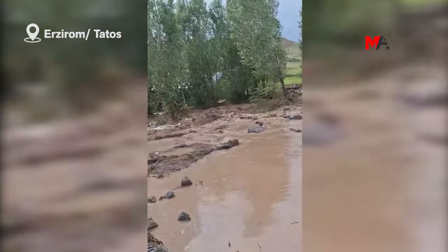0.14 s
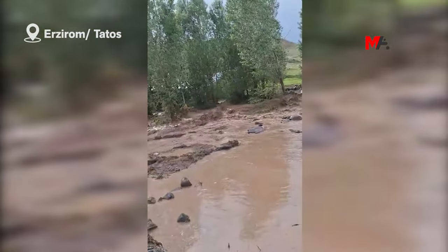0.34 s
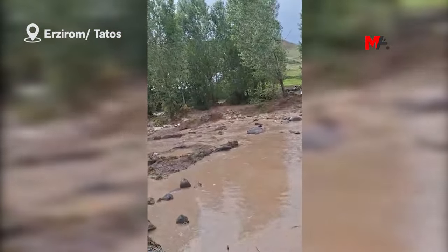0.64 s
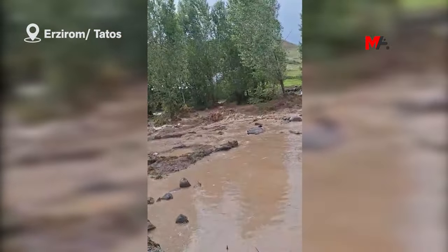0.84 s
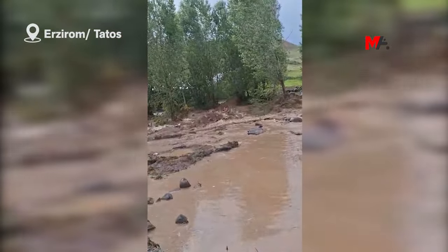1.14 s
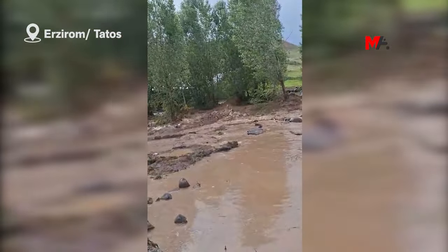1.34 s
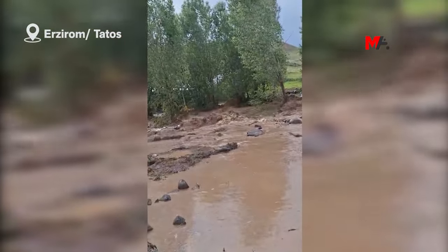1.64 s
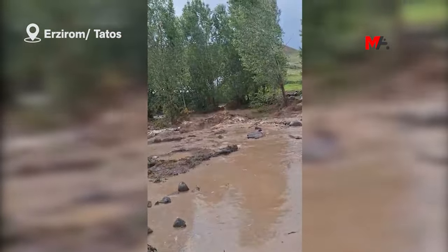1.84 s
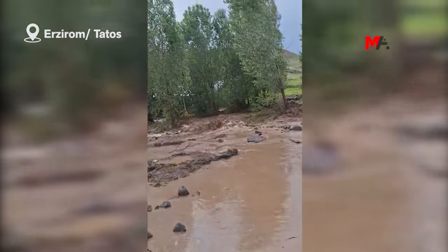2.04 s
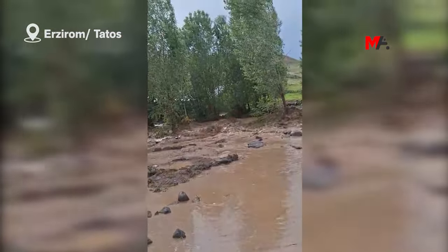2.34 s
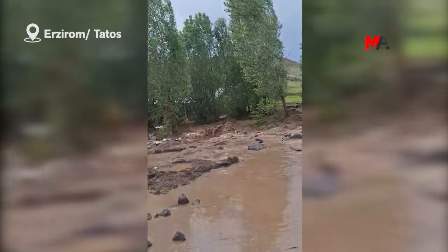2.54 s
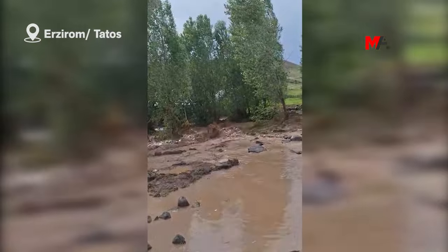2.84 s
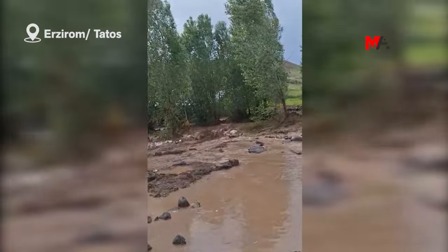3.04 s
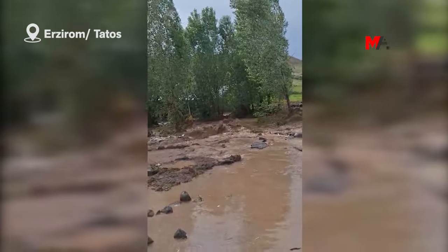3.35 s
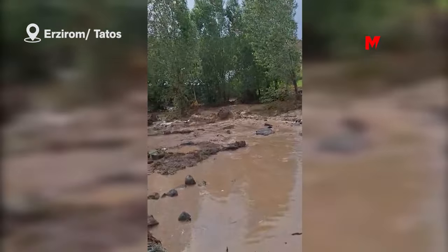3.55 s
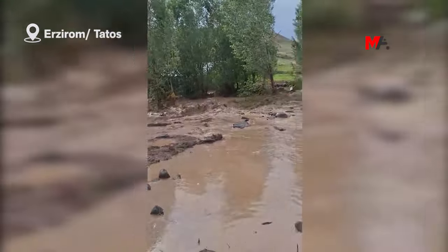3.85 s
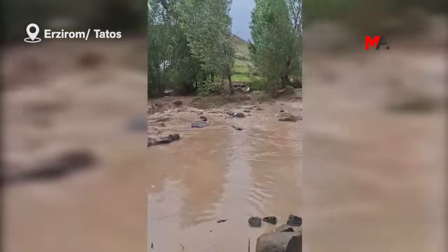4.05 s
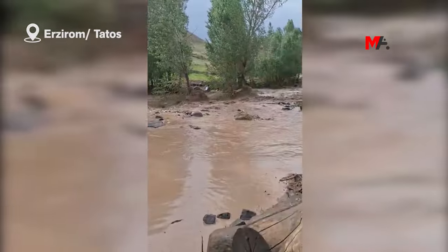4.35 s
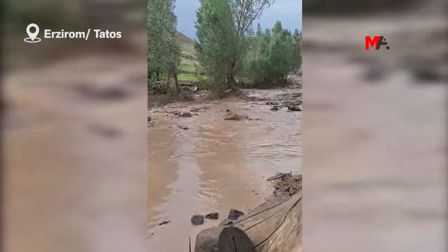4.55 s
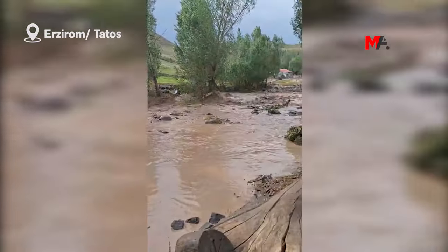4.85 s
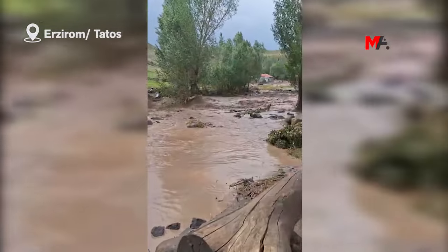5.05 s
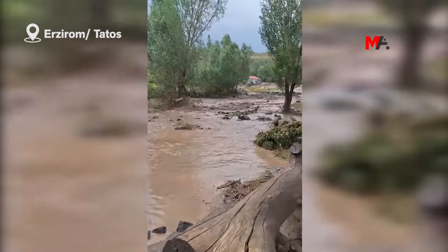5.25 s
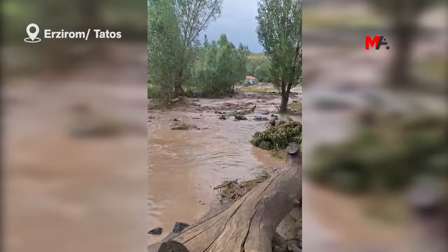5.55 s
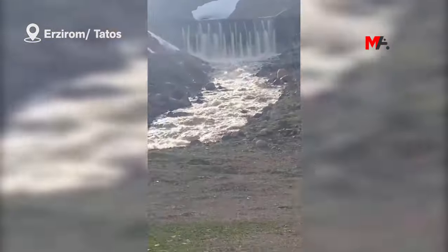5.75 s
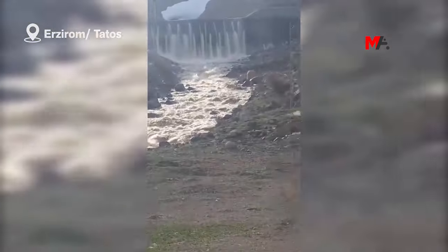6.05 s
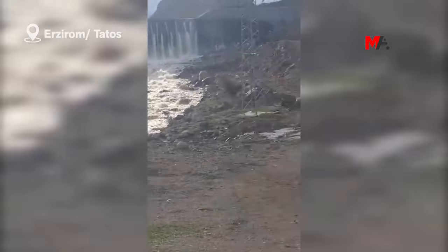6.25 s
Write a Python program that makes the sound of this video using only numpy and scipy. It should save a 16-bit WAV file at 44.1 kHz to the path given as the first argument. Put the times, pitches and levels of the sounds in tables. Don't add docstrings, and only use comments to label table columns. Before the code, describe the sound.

From 0 s, muddy floodwater rushes over rocks and debris: a steady, broad roar strongest in the low-mids, with subdued fizz and tiny bubbles blurred into it. Wind hits the hand-held stereo microphone from the start, a throbbing low rumble with irregular deep thumps, strong around 0.7, 1.0 and 1.5 s. From 1.8 to 2.9 s the thuds crowd together with quicker, brighter flaps. A very brief lull near 3.0 s precedes the heaviest overloaded thump at about 3.2 s, with more buffeting until 3.8 s. Around 4 s the wind weakens and leans left, and the water sinks a little, lowest near 4.2 s. Water recovers by 4.8 s; gusts return at 5.0 s and peak with hard thumps and sharp flaps at 5.3-5.5 s. At about 5.75 s everything cuts off abruptly, leaving silence to the end.

```python
import sys
import numpy as np
from scipy import signal
from scipy.fft import rfft, irfft, next_fast_len
from scipy.io import wavfile
from scipy.ndimage import uniform_filter1d, minimum_filter1d

SR = 44100
rng = np.random.default_rng(int(sys.argv[2]) if len(sys.argv) > 2 else 0)


def dump(signal):
    limited = np.clip(np.atleast_2d(signal).T, -1, 1)
    pcm = np.round(limited * 32767).astype(np.int16)
    wavfile.write(sys.argv[1], SR, pcm)


def to_linear_factor(level_db):
    exponent = np.asarray(level_db, float) / 20
    return 10 ** exponent


N = 282681

# time in seconds, water level in dB, treble shading in dB.
WATER_LEVEL = [(0.0, -17.5, 1.5), (1.41, -17, 1), (2.73, -17.5, 0.5), (3.37, -18.5, 1.5), (3.74, -19, 3),
               (3.92, -19.5, 3), (3.98, -20.5, 0.5), (4.12, -20, 0.5), (4.2, -24, 3), (4.75, -19, 1),
               (5.04, -20, 0), (5.12, -18.5, 1.5), (5.23, -19.5, -1), (5.5, -20, 1), (5.68, -19.5, 0),
               (5.74, -17, 0.5)]
# frequency in Hz, level in dB.
WATER_COLOUR = [(90, -18), (170, -5.5), (420, -10), (700, -9.5), (860, -16), (1900, -15), (2150, -17),
                (2400, -21.5), (3500, -24), (5200, -29), (5900, -30), (7500, -31.5), (8700, -35),
                (15700, -38.5)]
# time in seconds, strength in dB, left minus right in dB, likeness of ports (0-1).
GUSTS = [(0.0, -18, -2.5, .85), (0.3, -14.5, -1.5, .7), (0.9, -18, 1, .75), (1.3, -15, 1.5, .97),
         (1.8, -14.5, -1, .75), (2.2, -17, 0.5, .6), (2.5, -12.5, 0, .4), (2.85, -13, 0, .7),
         (3.1, -15.5, 2.5, .7), (3.45, -10.5, 0, .65), (3.66, -14, 0, .45), (3.95, -24, 18.5, .1),
         (4.3, -18.5, 5, .2), (4.55, -16.5, 4, .35), (4.75, -19, 0, .8), (5.05, -13.5, 1.5, .3),
         (5.3, -8.5, 0, .15), (5.74, -25, -4, .3)]
# start in seconds, peak in dB, pitch in Hz, left minus right in dB.
THUMP_EVENTS = [(0.025, -10, 103, 0.5), (0.079, -7, 70.4, -2), (0.375, -10, 61, 2.5), (0.735, -5, 121, 1.5),
                (0.972, -5, 72, 1), (1.523, -3, 94, -2), (1.638, -11, 87, -1.5), (1.766, -7.5, 108, -4.5),
                (1.98, -4.5, 134, 5.5), (2.105, -14, 155, 1), (2.228, -5, 75, 1), (2.523, -5, 63, 1),
                (2.751, -7, 99, 5.5), (3.003, -11.5, 51.1, 0.5), (3.094, -9.5, 95, -5), (4.665, -13, 80, 0),
                (3.225, 1.5, 75, 0.5), (3.432, -6.5, 94.8, 6.5), (3.565, -5, 95, 0), (3.711, -11.5, 69, 1),
                (3.804, -7.5, 62.4, 3), (4.009, -10.5, 71, 10), (4.094, -10, 59.6, 10),
                (4.159, -10.5, 62.5, 8), (4.386, -6, 70.0, -5), (4.928, -7.5, 146, -1),
                (5.044, -5.5, 98.3, -4), (5.6, -11, 70, 2.5), (5.335, -2.5, 76.7, 0.5),
                (5.437, -7.5, 138, -5)]
# start in seconds, peak in dB, pitch in Hz, left minus right in dB.
PUFF_EVENTS = [(0.146, -9, 94, 2), (1.047, -9, 102, -3), (1.116, -8, 143, 0.5), (1.233, -7.5, 129, 1),
               (1.37, -13.5, 67, 2.5), (1.831, -7, 127, 0.5), (1.883, -8, 105, 2), (1.93, -7, 161, -2.5),
               (2.262, -7, 89, 0.5), (2.318, -5.5, 121, -0.5), (2.658, -10.5, 75, 1.5),
               (2.795, -10.5, 105, -4), (2.828, -9, 73, 0.5), (2.881, -10, 94, -2.5), (2.917, -8.5, 89, 10),
               (3.164, -10.5, 65, 2), (3.259, -4, 110, -1), (3.282, -5, 86, -2.5), (3.314, -5.5, 70, 2.5),
               (3.478, -8, 81, -3.5), (4.421, -7, 129, 1), (4.571, -7.5, 78, 2), (4.985, -11, 81, 6),
               (5.068, -19, 89, 11), (5.117, -12.5, 67, -2), (5.243, -11, 70, 2.5), (5.38, -15, 70, -11.5),
               (5.468, -8.5, 148, -2)]
# start in seconds, peak in dB, pitch in Hz, left minus right in dB.
FLAP_EVENTS = [(0.844, -5, 242, -2), (1.421, -9, 284, 4), (1.533, -15.5, 182, -1.0),
               (1.82, -3.5, 209, -1.5), (2.001, -11, 210, -12), (2.278, -2.5, 266, -5),
               (2.35, -9.5, 400, -7), (2.397, -13, 202, -6), (2.502, -6, 211, 4), (2.536, -6, 238, -1),
               (2.57, -6, 283, -4), (2.65, -11, 191, -1.5), (2.741, -9, 202, -5), (2.812, -12, 225, 0.5),
               (3.1, -22, 257, 0.5), (3.439, -6, 181, 0.0), (4.569, -11.5, 205, 2.5),
               (4.826, -9.5, 273, -1), (4.993, -8.5, 187, 4), (5.024, -10.5, 380, -3),
               (5.051, -5, 199.5, -3.5), (5.109, -11, 278, 13.5), (5.336, -5.5, 190, 3.5),
               (5.437, -1.5, 285, -2.5), (5.453, 0.5, 322, 4), (5.557, -12.5, 200, -4)]

WHIP_ALIKE = 1.19


def evened(x):
    return x / np.sqrt(np.mean(x ** 2) + 1e-20)


def read(points, hz):
    f, value = np.transpose(points)
    return np.interp(np.log(hz + 1), np.log(f + 1), value)


def columns(rows, t):
    s, *rest = np.transpose(rows)
    return [np.interp(t, s, c) for c in rest]


def patches(frames, bins, long, wide):
    field = rng.standard_normal((frames, bins))
    over_time = np.hanning(41) ** (400 / long ** 2)
    over_pitch = np.hanning(81) ** (1600 / wide ** 2)
    return evened(signal.fftconvolve(field, np.outer(over_time, over_pitch), "same")).T


def pair(gain, same, lead, left_db, size):
    a, b, c, d = rng.standard_normal(gain.shape[::-1] + (4,)).T
    shared, own = a + 1j * b, c + 1j * d
    same = np.clip(same, 0, 1)
    left = shared * np.exp(1j * lead) * to_linear_factor(left_db)
    right = same * shared + np.sqrt(1 - same ** 2) * own
    z = np.array([left, right])
    return signal.istft(z * gain, nperseg=size, noverlap=size * 3 // 4)[1][:, :N]


def panned(x, pan_db):
    return x * to_linear_factor(np.array([pan_db / 2, -pan_db / 2]))


def lull(t):
    # time in seconds, change in dB (below 0 a lull, above 0 a swell), half length in seconds.
    lulls = [(0.32, -9, 0.039), (0.687, -1.5, .06), (0.88, 1.5, 0.093), (1.593, -0.5, 0.078),
             (2.2, 2.5, .05), (2.493, -3, .04), (2.975, -38, 0.024), (3.435, -14, 0.069),
             (3.644, -5.5, 0.034), (4.174, -9.5, 0.05), (4.48, -5, 0.045), (4.734, -4, .05),
             (5.204, -8, 0.088), (5.288, -6, 0.027), (5.417, -3, 0.029)]
    return sum(db * np.exp(-((t - s) / half) ** 2 * 2) for s, db, half in lulls)


def rush():
    # frequency in Hz, likeness (0-1).
    likeness = [(100, 0.8), (300, .95), (430, 0.71), (660, 1), (860, 0.69), (1200, 0.75), (2050, 0.67),
                (2600, 0.7), (3050, 0.3), (3400, 0.2), (4200, 0.4), (7000, .15), (9000, 0.05)]
    # frequency in Hz, lead in radians.
    left_lead = [(420, 0), (650, -.3), (780, -.2), (900, .4), (1250, .05), (1700, .4), (1900, 1.6),
                 (2400, 1.9), (2600, 1.6), (3100, 3.1), (4600, 5.2), (6300, 9.4), (9700, 15.7), (15400, 27)]
    # frequency in Hz, left minus right in dB.
    housing = [(250, 0), (600, 0), (800, -0.5), (1200, 0), (1900, -1.5), (2400, -0.5), (3400, 0.5),
               (4200, 1)]
    frames, hz = N // 128 + 5, np.fft.rfftfreq(512, 1 / SR)
    t = np.arange(frames) * 128 / SR
    roar_db, shade_db = columns(WATER_LEVEL, t)
    high = np.clip(np.log2(hz / 1800 + 1e-9) / 1.0, 0, 1)[:, None]
    top = np.clip(np.log2(hz / 7200 + 1e-9) / 0.38, 0, 1)[:, None]
    spray_db = -2.5 + 0.6 * shade_db - 0.5 * t
    treble_db = (1 - top) * shade_db + top * spray_db
    level_db = roar_db + (1 - high) * 0.12 * lull(t) + high * treble_db
    field_db = 1.52 * patches(frames, len(hz), 4.6, 3.3) + 0.5 * patches(frames, len(hz), 30, 45)
    colour_db = read(WATER_COLOUR, hz)
    gain = to_linear_factor(colour_db[:, None] + level_db + field_db)
    scale = np.sqrt(np.sum(to_linear_factor(colour_db)[(hz > 400) & (hz < 2200)] ** 2))
    bass = np.clip(np.log2(1000 / (hz + 1)) / 1.7, 0, 1)[:, None]
    exposed = bass * (1 - np.clip(WHIP_ALIKE * columns(GUSTS, t)[2], 0, 1))
    same = read(likeness, hz)[:, None] * (1 - exposed)
    x = pair(gain / scale, same, read(left_lead, hz)[:, None], read(housing, hz)[:, None], size=512)
    return panned(to_linear_factor(1.0) * x, -0.93 + np.zeros(N))


def bubbles(per_s=2500, low_hz=500, high_hz=6000, lag=12):
    out, fft_size = 0, next_fast_len(N + 1200)
    roar_db = columns(WATER_LEVEL, np.arange(N) / SR)[0]
    for hz in np.geomspace(low_hz, high_hz, num=16):
        turns = np.arange(1200) / SR * hz
        ring = np.sin(2 * np.pi * turns * (1 + 0.012 * turns)) * turns * np.exp(-turns / 2.12)
        ring = ring * to_linear_factor(read(WATER_COLOUR, hz)) * np.sqrt(hz)
        hit, size, side = rng.random((N, 3)).T
        at = np.flatnonzero(hit < per_s / 16 / SR)
        loudness = to_linear_factor(-3.5 * np.log(np.maximum(size[at], 0.02)))
        train = np.zeros((2, N))
        train[:, at] = loudness * np.array([side[at], 1 - side[at]]) ** 0.5
        out = out + rfft(train, fft_size) * rfft(ring, fft_size)
    out = irfft(out, fft_size)[:, :N]
    out[1] = np.roll(out[1], round(lag))
    return to_linear_factor(roar_db - 10.5) * evened(out)


def hush(t):
    depth_db, length_s = -4, 0.0144
    dips = [depth_db * np.exp(-((t - s - 1.45 / hz) / length_s) ** 2)
            for s, _, hz, _ in THUMP_EVENTS + PUFF_EVENTS]
    return np.min(dips, axis=0)


def wake(events, base_db, below_db, rise_s, fall_s, t):
    power = to_linear_factor(2 * base_db)
    for s, db, hz, _ in events:
        late = t - s - 1.4 / hz
        power = power + to_linear_factor(2 * (db + below_db)) * np.exp(-(late / np.where(late < 0, rise_s, fall_s)) ** 2)
    return 10 * np.log10(power)


def wind():
    # frequency in Hz, level in dB per Hz.
    buffet_colour = [(12, -47), (20, -31.5), (70, 1.5), (86, -3), (180, -6.5), (230, -38.5), (400, -120)]
    # frequency in Hz, level in dB per Hz.
    whip_colour = [(60, -34.5), (150, -12), (250, 7), (450, 2), (900, -8.5), (2000, -36.5)]
    t, hz = np.arange(N) / SR, np.fft.rfftfreq(2048, 1 / SR)
    steps = np.arange(N // 128 + 2) * 128 / SR
    strength_db, pan_db, _ = columns(GUSTS, steps)
    gust_db = wake(THUMP_EVENTS, strength_db + lull(steps), -9.5, rise_s=0.015, fall_s=0.053, t=steps)
    gust_db = gust_db + hush(steps)
    whip_db = -19.5 + 0.74 * (strength_db + 17.5) + 0.34 * lull(steps)
    whip_db = wake(FLAP_EVENTS, whip_db, -15, rise_s=0.015, fall_s=0.036, t=steps)
    gust_db, whip_db, pan_db = (np.interp(t, steps, v) for v in (gust_db, whip_db, pan_db))
    same = columns(GUSTS, np.arange(N // 512 + 5) * 512 / SR)[2]
    low_gain = to_linear_factor(read(buffet_colour, hz))[:, None] + 0 * same
    low = evened(pair(low_gain, same, -0.29, 0, size=2048))
    whip_gain = to_linear_factor(read(whip_colour, hz))[:, None] + 0 * same
    whip = evened(pair(whip_gain, WHIP_ALIKE * same, -0.04, 0, size=2048))
    low = low / np.sqrt(uniform_filter1d(low ** 2, 5000) + 0.05)
    whip = whip / np.sqrt(uniform_filter1d(whip ** 2, 3000) + 0.1)
    two_rows = patches(len(steps), 200, 1.3, 34)[[100, 106]]
    lumps = np.array([np.interp(t, steps, row) for row in two_rows])
    lumps = np.tanh(lumps / 0.9) * 1.55
    buffet = to_linear_factor(gust_db - 2.5) * low * evened(to_linear_factor(3.2 * lumps))
    lash = to_linear_factor(whip_db - 4.0) * whip * evened(to_linear_factor(3.3 * lumps))
    return panned(buffet + lash, pan_db)


def thumps():
    out, t = np.zeros((2, N + SR)), np.arange(SR // 6) / SR
    slow = THUMP_EVENTS + PUFF_EVENTS
    kinds = [(8.7, -0.6)] * len(slow) + [(8.9, -1.5)] * len(FLAP_EVENTS)
    luck = rng.random((len(kinds), 2))
    for (s, db, hz, pan_db), (turns, kind_db), (phase, skew) in zip(slow + FLAP_EVENTS, kinds, luck):
        rise = 1 - np.exp(-(t * hz / 1.2) ** 2)
        unlike = 1 - np.clip(columns(GUSTS, s)[2], 0, 1)
        apart = 0.44 * np.clip(-db / 8.0, 0.25, 1) * unlike * (skew + 0.5) * np.array([[-0.5], [0.5]])
        swing = np.sin(2 * np.pi * (hz * t * (1 + 1.06 * t) + phase + apart))
        swing = swing * rise * to_linear_factor(-60 * t * hz / turns)
        at = round(s * SR)
        out[:, at:at + len(t)] += panned(swing * to_linear_factor(db + kind_db) / abs(swing).max(), pan_db + 0 * t)
    return out[:, :N]


def thinned(x):
    hz, t, z = signal.stft(x, SR, nperseg=1024, noverlap=768)
    treble = np.clip(np.log2(hz / 1500 + 1e-9) / 2.7, 0, 1)[:, None]
    luck = patches(len(t), len(hz), 9, 4)
    nearby = uniform_filter1d(uniform_filter1d(abs(z), size=15, axis=1), size=5, axis=2)
    kept = (abs(z) / (nearby + 1e-9)) ** (0.35 * treble)
    silent_db = -22 * treble ** 4 * np.clip(-luck - 1.2, 0, 1)
    z = z * kept * to_linear_factor(silent_db) * (hz < 15730)[:, None]
    return signal.istft(z, SR, nperseg=1024, noverlap=768)[1][:, :N]


def scene():
    return rush() + bubbles() + wind() + thumps()


def low_pass(x):
    return signal.sosfilt(signal.butter(12, 15860, fs=SR, output="sos"), x)


def record(dry):
    thin = thinned(dry)
    room = np.minimum(1, 1.05 / (abs(thin) + 1e-9))
    held = thin * uniform_filter1d(minimum_filter1d(room, size=81), size=81)
    after = np.arange(N) / SR - 5.7455
    smear = to_linear_factor(-45 - 7700 * np.maximum(after, 0)) * (after < 0.024)
    return low_pass(held * np.where(after < 0, 1, smear))


dry = scene()
out = record(dry)
dump(out)
```